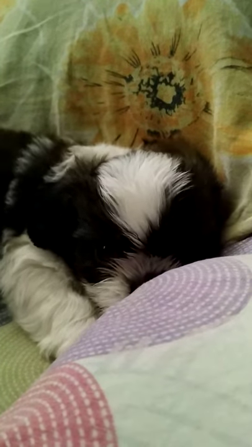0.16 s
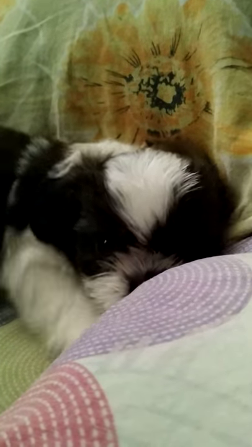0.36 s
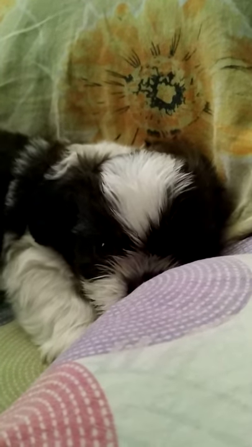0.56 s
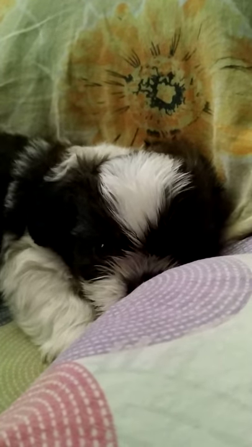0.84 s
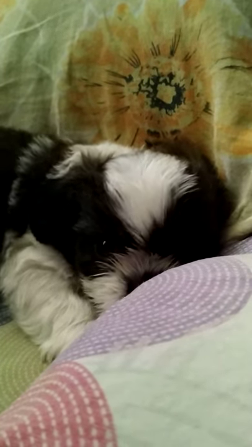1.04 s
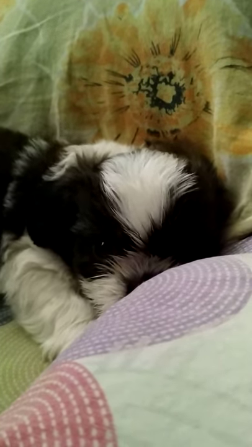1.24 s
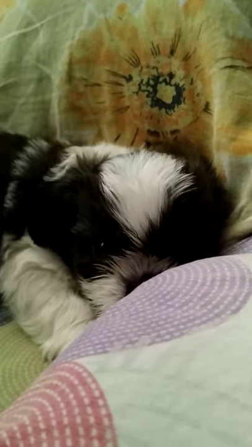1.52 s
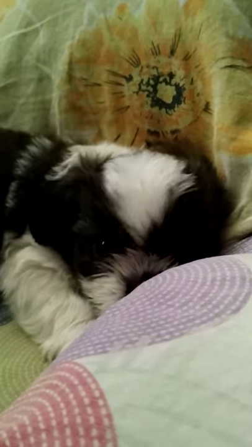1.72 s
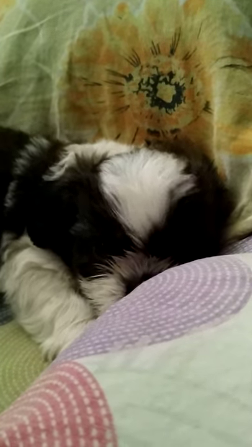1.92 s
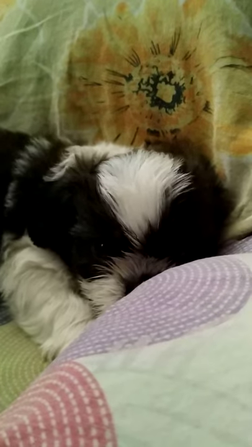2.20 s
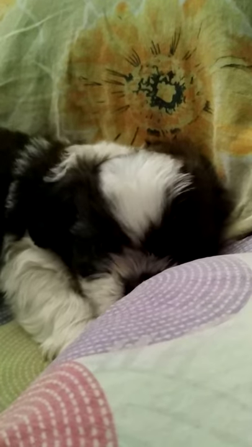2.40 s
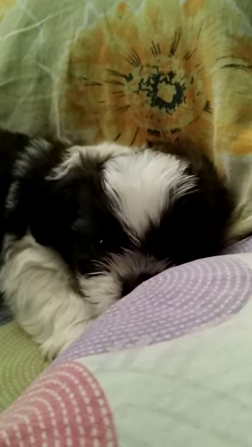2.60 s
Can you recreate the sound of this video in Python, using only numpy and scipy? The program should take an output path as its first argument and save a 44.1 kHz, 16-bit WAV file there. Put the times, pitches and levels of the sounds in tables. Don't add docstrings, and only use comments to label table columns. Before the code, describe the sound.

Four sharp little dog yaps, spaced under a second apart, with faint bedding rustle and room hum.

```python
import sys
import numpy as np
from scipy import signal
from scipy.fft import rfft, irfft
from scipy.io import wavfile
from scipy.ndimage import uniform_filter1d

SR = 44100
rng = np.random.default_rng(int(sys.argv[2]) if len(sys.argv) > 2 else 0)


def volts_from_db(level):
    exponent = np.asarray(level, float) / 20
    return 10 ** exponent


def generate_wav(signal):
    frames = np.transpose(np.atleast_2d(signal))
    scaled = np.clip(frames, -1, 1) * 32767
    pcm = np.round(scaled).astype(np.int16)
    wavfile.write(sys.argv[1], SR, pcm)


N = 121275

# start_s, jaw_closes_s, mid_db (3-8 kHz), top_db (above 8 kHz), hiss_db
YAP_COLOURS = [
    (0, 0.266, 5, -8, -26),
    (.8, 1.113, -1, -15.5, -31.5),
    (1.5, 1.881, -6, -20.5, -36.5),
    (2.2, 2.434, -4, -15, -31),
]
# hollow_db, puff_db, softening_db_per_octave, rise_dulling_share (0-1), room_send_db
JAW_CLOSINGS = [
    (-21.5, -37, 0, 0.26, 3),
    (-20, -18, 1, 0.76, -0.5),
    (-7.5, -21, 5, 0.36, -2),
    (-6.5, -24, 4, 0.13, -0.5),
]
# start_s, length_s, cycles_per_pattern, depth (0-1)
SKIPPED_BEATS = [
    (0.208, .028, 3, 0.16),
    (1.817, 0.017, 2, 0.4),
    (1.056, 0.0086, 2, 0.8),
    (1.203, 0.022, 2, 0.3),
    (2.391, 0.012, 2, 0.15),
    (2.495, 0.025, 2, 0.15),
]


def rms_one(x):
    return x / np.sqrt(np.mean(x ** 2) + 1e-20)


def ramp(x):
    return np.clip(x, 0, 1)


def in_time(rows):
    s, *columns = np.transpose(rows)
    return [np.interp(np.arange(N) / SR, s, c) for c in columns]


def at_hz(points, hz):
    hz_points, db_points = np.transpose(points)
    return np.interp(np.log(hz), np.log(hz_points), db_points)


def drift(rate_hz):
    r = np.exp(-2 * np.pi * rate_hz / SR)
    settle = 9999
    noise = rng.standard_normal(N + settle)
    return rms_one(signal.lfilter([1], [1, -2 * r, r * r], noise)[settle:])


def band(x, low_hz, high_hz):
    sos = signal.butter(2, [low_hz, min(high_hz, .45 * SR)], "band", fs=SR, output="sos")
    return signal.sosfilt(sos, x)


def band_noise(low_hz, high_hz):
    return rms_one(band(rng.standard_normal(N), low_hz, high_hz))


def coloured(spectrum):
    hz = np.maximum(np.arange(N // 2 + 1) * SR / N, 1)
    return rms_one(irfft(rfft(rng.standard_normal(N)) * volts_from_db(at_hz(spectrum, hz)) * (hz > 18), N))


def window(start_s, length_s, edge_s):
    t = np.arange(N) / SR
    return ramp(np.minimum(t - start_s, start_s + length_s - t) / edge_s + .5)


def clicks(rows):
    out = np.full(N, 1e-18)
    for s, db in rows:
        out[int(s * SR)] = volts_from_db(db)
    return out


def bell(hz, centre_hz, octaves):
    return np.exp(-(np.log2(hz / centre_hz) / octaves) ** 2)


def per_yap(table):
    yap = np.searchsorted(np.array(YAP_COLOURS)[:, 0], np.arange(N) / SR, "right") - 1
    return np.array(table)[yap].T


def background():
    # hz, level_db (per Hz)
    floor = [(45, -5.5), (129, -4), (222, -6.5), (254, -2.5), (380, -9.5), (900, -16), (1350, -25),
             (2700, -27), (4600, -38.5), (15600, -47.5)]
    # centre_hz, width_hz, level_db
    hum = [
        (88, 6.1, -51.5),
        (123.4, 38, -50),
        (250.8, 14, -56),
    ]
    drone = sum(volts_from_db(db) * band_noise(hz - w / 2, hz + w / 2) for hz, w, db in hum)
    floor_db = -45 + .5 * drift(1.1)
    hiss = volts_from_db(-69) * rng.standard_normal(N)
    return volts_from_db(floor_db) * coloured(floor) + drone + hiss


def bedding():
    # start_s, length_s, level_db
    presses = [
        (0.357, 0.073, -47),
        (0.55, 0.029, -33.5),
        (0.593, 0.026, -37.5),
    ]
    # start_s, peak_db
    fabric_ticks = [
        (.527, -62),
        (.566, -48),
        (.583, -44),
        (1.555, -47),
    ]
    # time_s, level_db
    sliding = [(.54, -84), (.57, -66), (.66, -76), (.85, -75), (1.0, -75), (1.1, -95)]
    # time_s, rumble_db
    settling = [(0, -58), (.3, -49), (.6, -40.5), (1.0, -65), (1.3, -68)]
    lumps = band_noise(13, 255) + 0.071 * rms_one(band(rng.standard_normal(N), 300, 2510))
    bumps = lumps * sum(volts_from_db(db) * window(s, length, 0.026) for s, length, db in presses)
    rumble = volts_from_db(in_time(settling)[0]) * band_noise(25, 85)
    tick_noise = signal.lfilter([1], [1, -.985], clicks(fabric_ticks)) * rng.standard_normal(N)
    rub_hz, rub_width_hz = 11500, 1240
    rub = band_noise(rub_hz - rub_width_hz / 2, rub_hz + rub_width_hz / 2)
    rub = rub * volts_from_db(in_time(sliding)[0] + 2.6 * drift(20.5))
    return bumps + rumble + band(tick_noise, 7480, 15000) + rub


def room(x):
    t60_s, level_db, low_hz = 0.33, -18, 2830
    t = np.arange(SR // 2) / SR
    tail = rng.standard_normal(len(t)) * volts_from_db(-60 * t / t60_s) * ramp(t / 0.011 - .3)
    tail = band(tail, low_hz, 9000) + .6 * band(tail, 4500, 5400)
    return volts_from_db(level_db) * signal.fftconvolve(x, tail / np.sqrt(np.sum(tail ** 2)))[:N]


def rattle():
    # time_s, rate_hz, level_db
    flaps = [(0.299, 382, -52), (0.306, 358, -30), (.316, 335, -35), (.328, 304, -25), (0.343, 280, -31),
             (0.347, 403, -32.5), (0.356, 406, -23.5), (0.365, 393, -34.5), (0.372, 375, -35)]
    rate, db = in_time(flaps)
    cycles = np.cumsum(rate * (1 + 0.03 * drift(118))) / SR
    phase = 2 * np.pi * cycles
    flap = np.sin(phase) + .1 * np.sin(2 * phase) + .2 * np.sin(2.5 * phase)
    flap = flap * (1 + .4 * np.cos(phase / 2))
    start_s, end_s = flaps[0][0], flaps[-1][0]
    return flap * volts_from_db(db + 2 * drift(120)) * window(start_s, end_s - start_s, .004)


def creaks():
    # start_s, peak_db
    fold_pulses = [
        (1.288, -25),
        (1.2925, -25),
        (1.323, -29),
        (1.337, -31),
    ]
    hit = signal.lfilter([.25], [1, -.75], -clicks(fold_pulses))
    return 30 * band(hit, 120, 450) + 7 * band(hit, 700, 1200) + 2.5 * band(hit, 1800, 2700)


def colour(hz):
    # hz, gain_db
    throat = [(250, -5), (600, 6), (1200, -0.5), (2000, -1.5), (2800, -1.5), (3100, -5.5), (3900, -6.5),
              (5000, -10.5)]
    # hz, gain_db
    head = [(5000, 0.5), (5450, -10.5), (6300, -1.5), (7700, -11), (9100, -9.5), (11300, -10.5),
            (13800, -9), (15400, -14)]
    return volts_from_db(at_hz(throat, hz) + at_hz(head, hz))


def fold_motion():
    # time_s, pitch_hz, level_db, mouth_lift_db
    arches = [
        [(0.21, 1002, -15, 10.5), (0.216, 1166, -14, 12), (0.227, 1229, -16, 16.5), (0.25, 1251, -17, 12.5),
         (0.266, 1301, -20.5, 4), (0.305, 1196, -23.5, 5.5), (0.323, 985, -24, 5), (0.352, 744.2, -31, -5),
         (0.369, 638, -40, -4)],
        [(1.062, 1030, -19, -4.5), (1.08, 1187, -16.5, -5.5), (1.106, 1318, -17.5, -9),
         (1.112, 1295, -18.5, -7.5), (1.136, 1182, -18.5, -2), (1.158, 905, -21, 6.5), (1.168, 831, -22.5, 2),
         (1.173, 695, -28, 0), (1.177, 515, -27, 9)],
    ]
    # time_s, pitch_hz, level_db, mouth_lift_db
    soft_arches = [
        [(1.818, 740, -43, -18), (1.834, 791.4, -30, 8), (1.85, 1051, -19.5, -8), (1.878, 1280, -21, -9.5),
         (1.904, 1101, -19, -6.5), (1.916, 937, -21, 1), (1.932, 683, -26.5, -2), (1.95, 569.3, -30.5, -1),
         (1.962, 496, -34, -1)],
        [(2.394, 680, -36, 8), (2.404, 801, -33, 12), (2.42, 1000, -21.5, 10), (2.436, 1160, -21.5, 6.5),
         (2.448, 1238, -21, 1.5), (2.47, 1019, -24, 1.5), (2.482, 807, -25, -0.5), (2.492, 636.5, -30.5, 2),
         (2.5, 505, -31.5, 4)],
    ]
    # time_s, pitch_hz, level_db, mouth_lift_db
    chest = [
        [(.191, 552.6, -40, 7), (.199, 603, -22, 15.5), (.2055, 613, -20, 14)],
        [(1.041, 590, -42, 2), (1.05, 617, -27, 7.5), (1.058, 681, -30.5, -1.5)],
        [(1.182, 449, -26, 0.5), (1.2, 379, -28.5, 1.5), (1.214, 322, -31.5, 4), (1.226, 283.5, -35.5, 3),
         (1.236, 273.6, -34.5, 2), (1.248, 258, -31.5, 1), (1.257, 231, -34.5, 8)],
        [(1.968, 344, -31, 6.5), (1.99, 304.4, -38, 10.5), (2.04, 241, -43.5, -6)],
        [(2.506, 427.5, -33.5, 7.5), (2.516, 367, -32, -3), (2.53, 329.2, -39.5, -4), (2.545, 310.8, -44, -11)],
    ]
    parts = sorted(list(arches) + list(soft_arches) + list(chest), key=lambda rows: rows[0][0])
    pitch, db, mouth_db = in_time([row for rows in parts for row in rows])
    glide_s, arch_glide_s, close_s = 0.0058, .016, 0.0012
    quick = uniform_filter1d(pitch, int(glide_s * SR) + 1)
    slow = uniform_filter1d(pitch, int(arch_glide_s * SR) + 1)
    pitch = quick + (slow - quick) * ramp((quick - 1000) / 150)
    spans = [(chest[0], arches[0]), (chest[1], chest[2]), (soft_arches[0], chest[3]),
             (soft_arches[1], chest[4])]
    gate = sum(window(a[0][0], b[-1][0] - a[0][0], close_s) for a, b in spans)
    return pitch, uniform_filter1d(db, int(glide_s * SR)), mouth_db, gate


def harmonics(on, pitch, mouth_db, cycles, closing):
    # palate_db, slack_throat_db, breathiness_db
    rings = [
        (3.5, 3, 1),
        (-0.5, 9.5, 3.5),
        (-4, 6, 3),
        (5, 4, 3),
    ]
    pitch, mouth_db, cycles, closing = pitch[on], mouth_db[on], cycles[on], closing[on]
    _, _, mid_db, top_db, _ = per_yap(YAP_COLOURS)[:, on]
    hollow_db, _, soft_db, rise_share, _ = per_yap(JAW_CLOSINGS)[:, on]
    palate_db, throat_db, _ = per_yap(rings)[:, on]
    slackness = (1200 - pitch) / 700
    soft = closing * ramp((590 - pitch) / 250)
    top_db = top_db - 17 * ramp(slackness) * (1 - closing)
    dulling_db = 22 * (rise_share + (1.5 - rise_share) * closing) * np.clip(slackness, 0, 2)
    waver_db = [2.5 * drift(38)[on] for _ in range(6)]
    tone, power = 0, 0
    for k in range(1, 36):
        hz = k * pitch
        gain_db = mouth_db * bell(hz, 2044, 0.58)
        gain_db = gain_db - dulling_db * ramp(np.log2(hz / 2500) * 2)
        gain_db += np.where(hz > 8200, top_db, mid_db * ramp(hz / 1000 - 2.5))
        gain_db += 28 * ramp(2 - hz / 200)
        gain_db -= soft_db * soft * np.maximum(np.log2(hz / 370), 0)
        gain_db += palate_db * bell(hz, 5300, .12)
        gain_db += throat_db * soft * bell(hz, 1000, 0.21)
        gain_db += hollow_db * closing * bell(hz, 3383, 0.23)
        if k > 2:
            gain_db += waver_db[k % 6]
        gain = colour(hz) * volts_from_db(gain_db) * ramp((16500 - hz) / 2200)
        lag = np.maximum(np.log2(hz / 1500), 0) + 1.9 * soft * np.log2(k)
        tone = tone - gain * np.cos(2 * np.pi * k * cycles - lag)
        power = power + gain ** 2 / 2
    out = np.zeros(N)
    out[on] = tone / np.sqrt(power)
    return out


def skip_beats(tone, cycles):
    for s, length, count, depth in SKIPPED_BEATS:
        beat = np.cos(2 * np.pi * cycles / count)
        tone = tone + band(tone * depth * window(s, length, 0.0023) * beat, 1050, 6200)
    return tone


def breath_noise(pitch, cycles, slack, closing):
    # palate_db, slack_throat_db, breathiness_db
    rings = [
        (3.5, 3, 1),
        (-0.5, 9.5, 3.5),
        (-4, 6, 3),
        (5, 4, 3),
    ]
    hiss_db, puff_db, breathy_db = per_yap(YAP_COLOURS)[4], per_yap(JAW_CLOSINGS)[1], per_yap(rings)[2]
    hz = np.arange(N // 2 + 1) * SR / N + 1
    tilt = np.clip(hz / 1500, 0, 3.0) ** 2.2
    air = irfft(rfft(rng.standard_normal(N)) * colour(hz) * tilt, N)
    flip_s, flip_length_s = SKIPPED_BEATS[0][:2]
    breath = (1 + 1.3 * window(flip_s, flip_length_s, 0.009)) * rms_one(band(air, 300, 6800))
    breath = breath * (1 + 0.46 * np.cos(2 * np.pi * cycles))
    clear_db, chest_db = -31, -25
    breath_db = breathy_db + clear_db + (chest_db - clear_db) * slack
    breath = breath * volts_from_db(breath_db - 0.039 * np.maximum(450 - pitch, 0))
    hiss = rms_one(band(air, 9800, 12100)) + 0.93 * rms_one(band(air, 12600, 14600))
    hiss = hiss * (0.25 + closing * ramp(slack * 32.0))
    hiss = hiss * volts_from_db(hiss_db - 0.026 * np.maximum(500 - pitch, 0))
    puff = closing * ramp(slack * 3.83) * rms_one(band(air, 5830, 7900))
    puff = puff * volts_from_db(puff_db - 0.021 * np.maximum(650 - pitch, 0))
    return breath + hiss + puff


def voice():
    pitch, db, mouth_db, gate = fold_motion()
    slack = ramp((1200 - pitch) / 700)
    jitter = .003 * (1 + 8.17 * slack ** 2)
    cycles = np.cumsum(pitch * (1 + jitter * drift(152.7))) / SR
    jaw_s = per_yap(YAP_COLOURS)[1]
    closing = ramp((np.arange(N) / SR - jaw_s) / 0.0026)
    tone = skip_beats(harmonics(gate > 0, pitch, mouth_db, cycles, closing), cycles)
    shimmer_db = .35 * (1 + 3 * slack ** 2) * np.clip(drift(150), -2, 1.5)
    return (tone + breath_noise(pitch, cycles, slack, closing)) * gate * volts_from_db(db + shimmer_db)


def scene():
    dog = voice() + rattle() + creaks()
    send_db = per_yap(JAW_CLOSINGS)[-1]
    duck_db, duck_s = -3.5, 0.01
    loudness = uniform_filter1d(np.abs(dog), int(duck_s * SR))
    duck = volts_from_db(duck_db * ramp(loudness / 0.18))
    return (dog + room(dog * volts_from_db(send_db)) + bedding() + duck * background())[None]


def low_pass(x):
    return signal.sosfilt(signal.butter(12, 15780, fs=SR, output="sos"), x)


def record(dry):
    mix = 0.74 * np.tanh(dry / 0.68)
    return low_pass(mix)


dry = scene()
out = record(dry)
generate_wav(out)
```